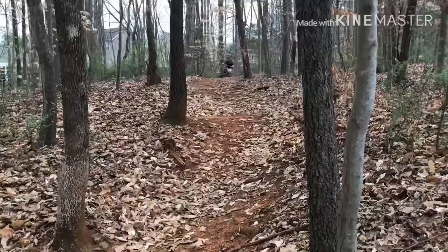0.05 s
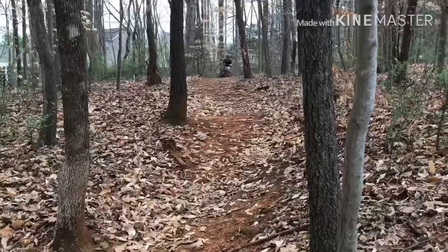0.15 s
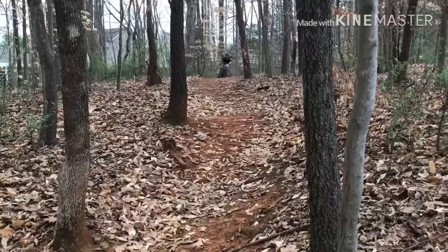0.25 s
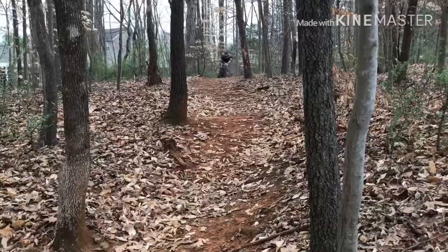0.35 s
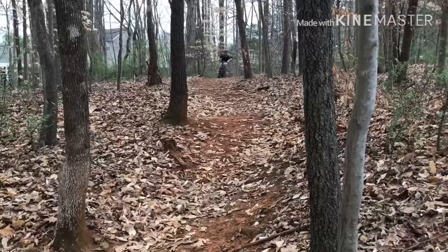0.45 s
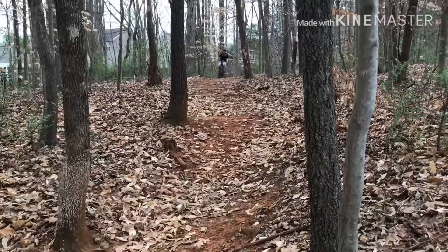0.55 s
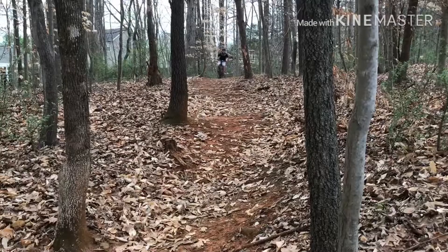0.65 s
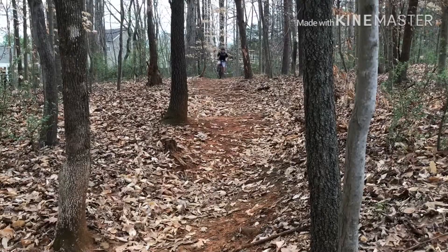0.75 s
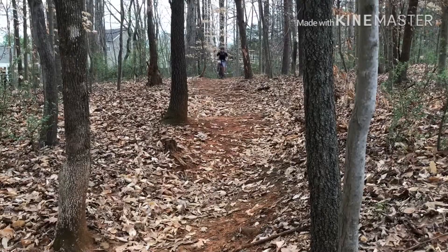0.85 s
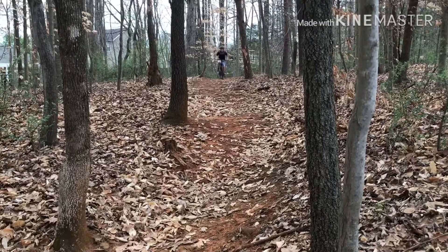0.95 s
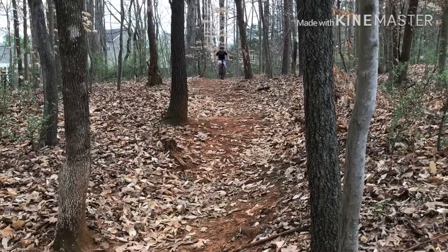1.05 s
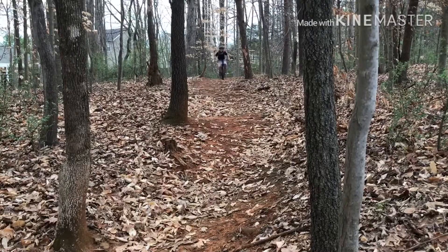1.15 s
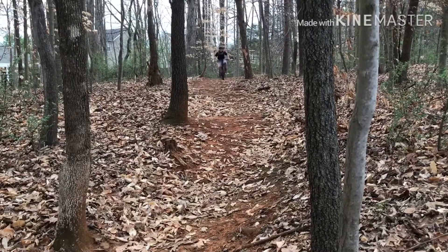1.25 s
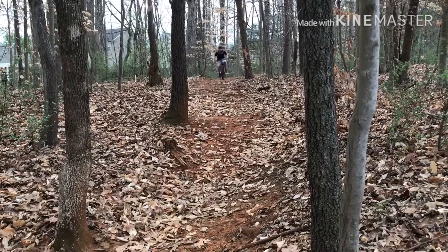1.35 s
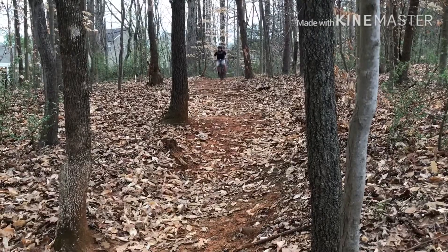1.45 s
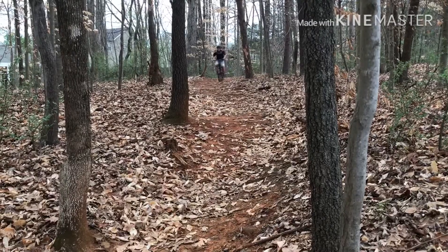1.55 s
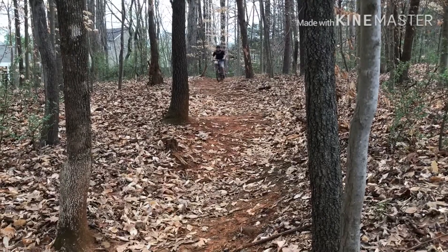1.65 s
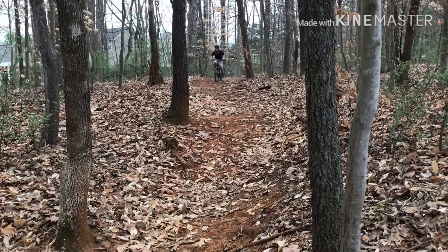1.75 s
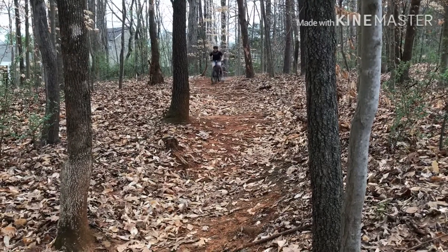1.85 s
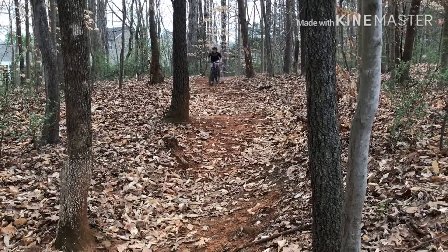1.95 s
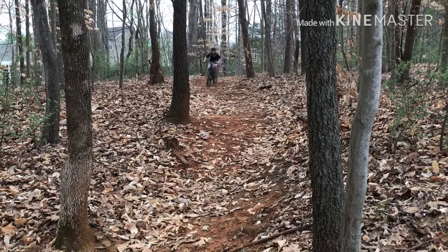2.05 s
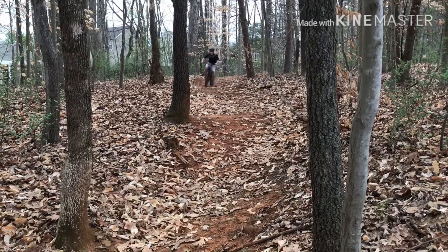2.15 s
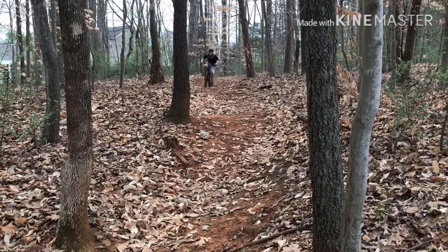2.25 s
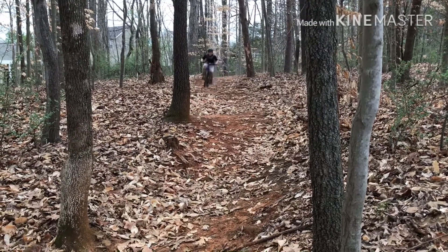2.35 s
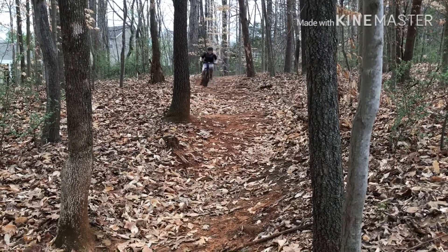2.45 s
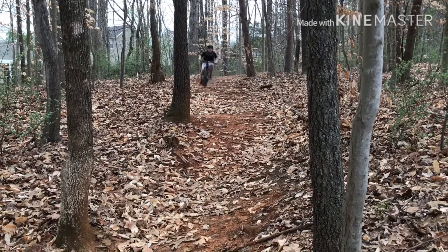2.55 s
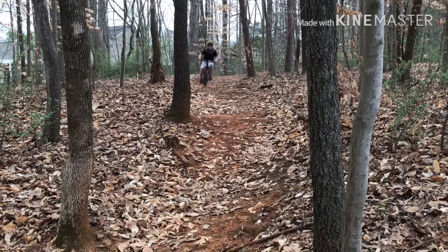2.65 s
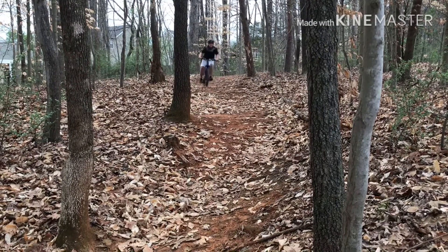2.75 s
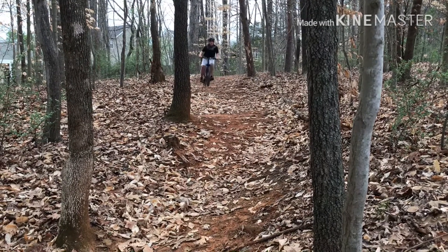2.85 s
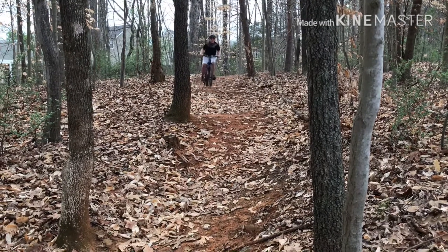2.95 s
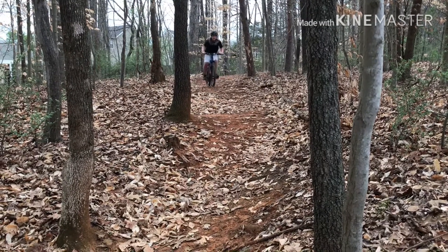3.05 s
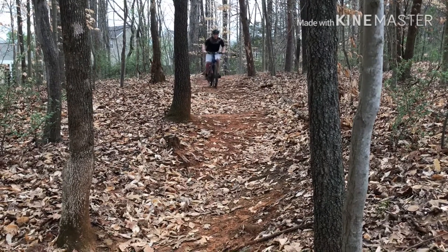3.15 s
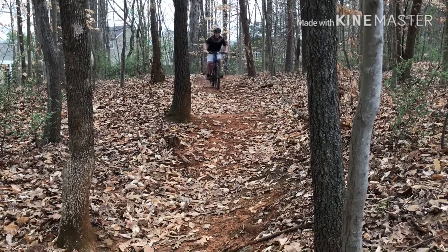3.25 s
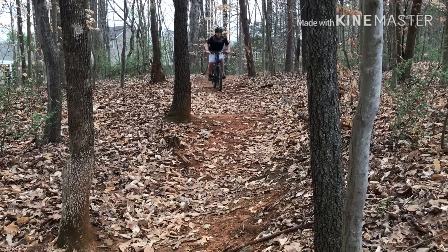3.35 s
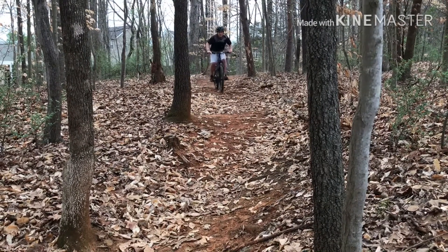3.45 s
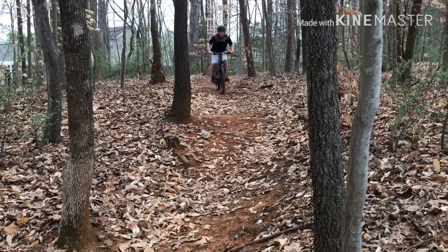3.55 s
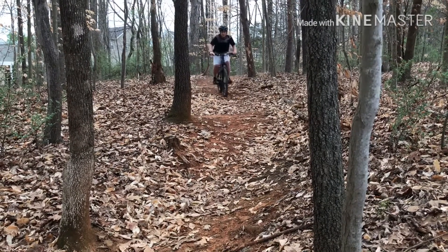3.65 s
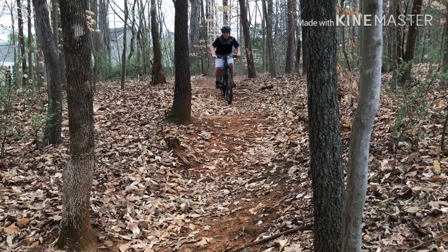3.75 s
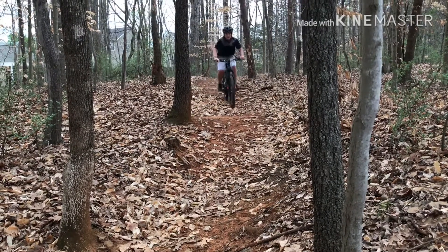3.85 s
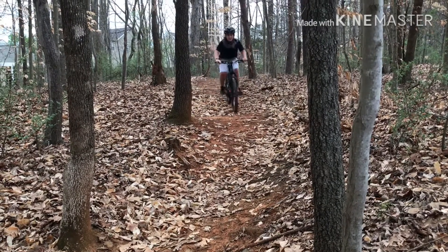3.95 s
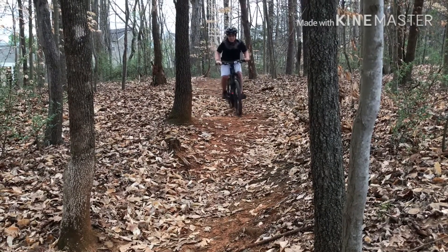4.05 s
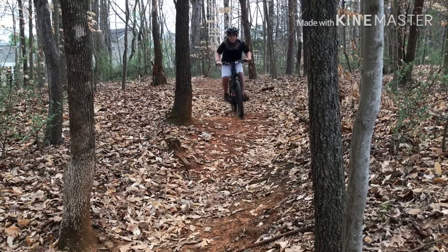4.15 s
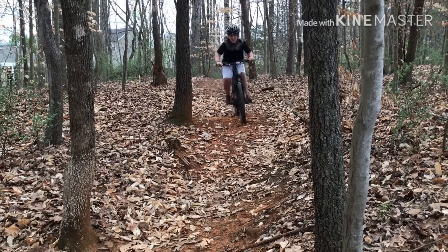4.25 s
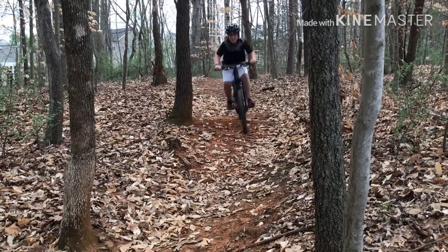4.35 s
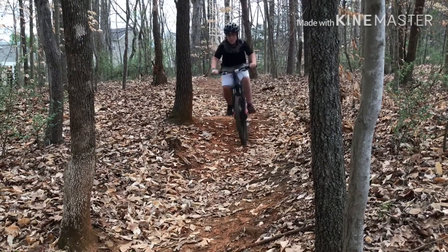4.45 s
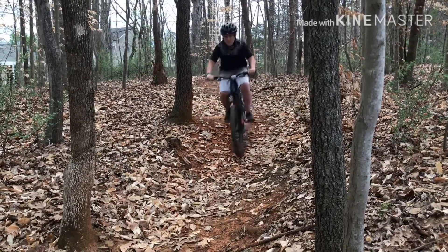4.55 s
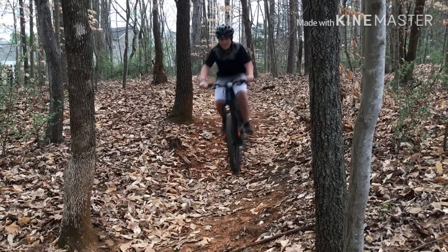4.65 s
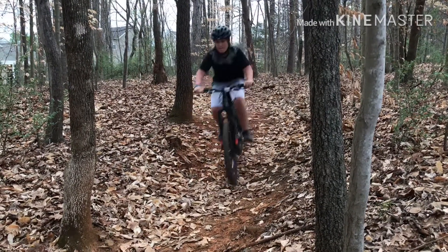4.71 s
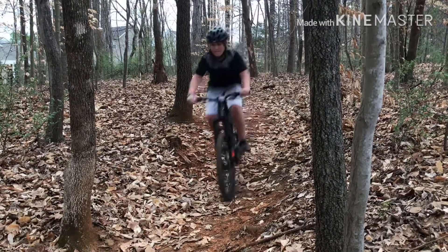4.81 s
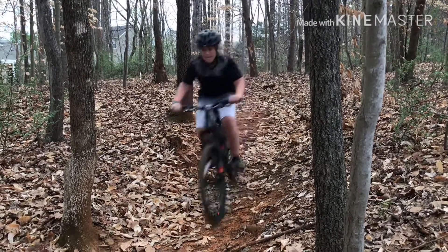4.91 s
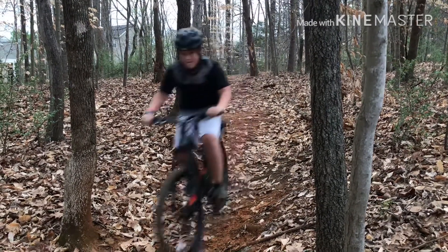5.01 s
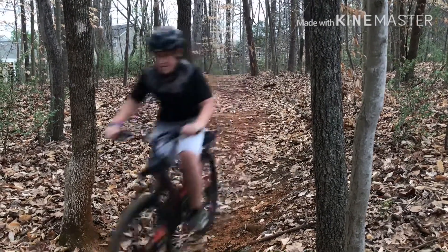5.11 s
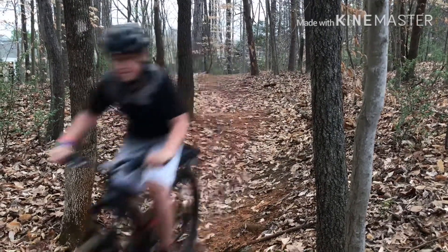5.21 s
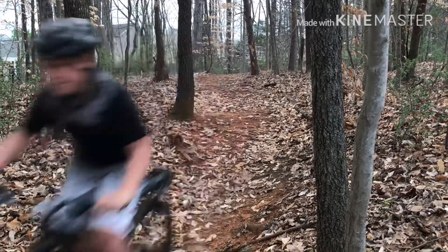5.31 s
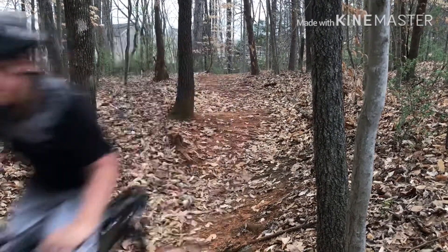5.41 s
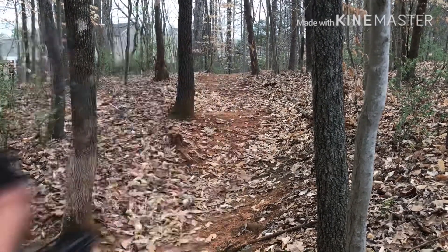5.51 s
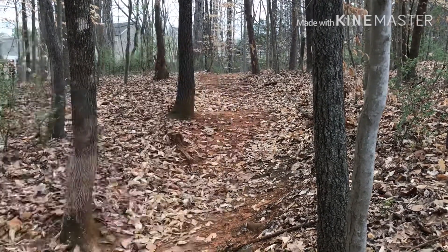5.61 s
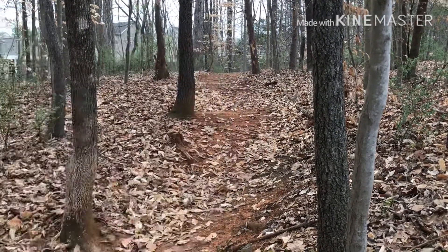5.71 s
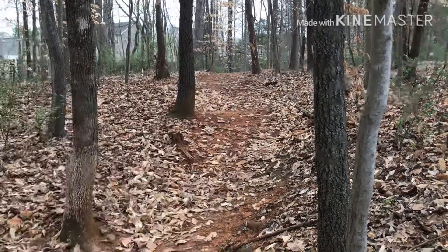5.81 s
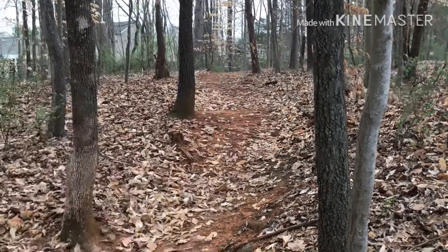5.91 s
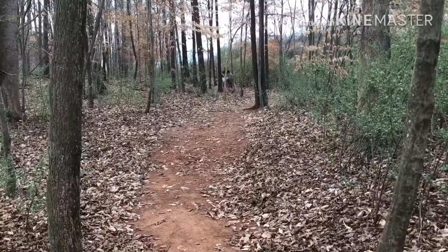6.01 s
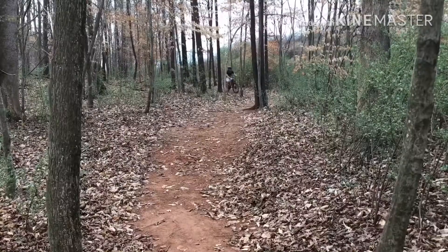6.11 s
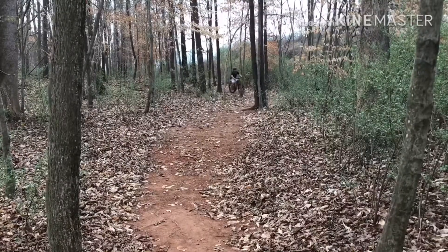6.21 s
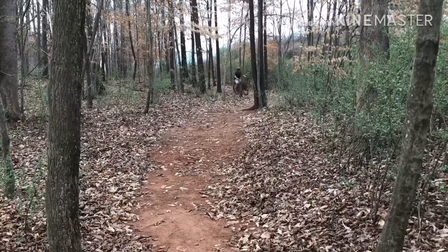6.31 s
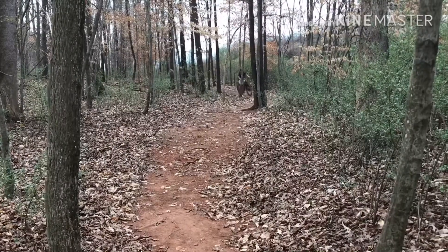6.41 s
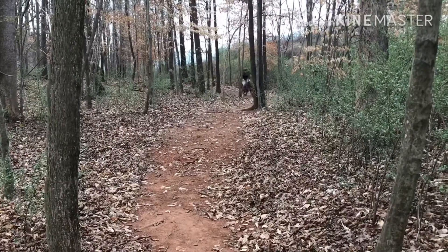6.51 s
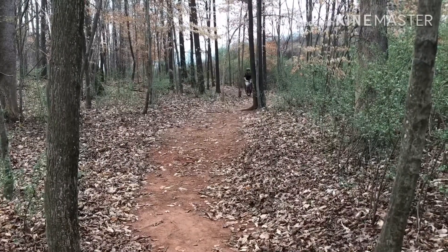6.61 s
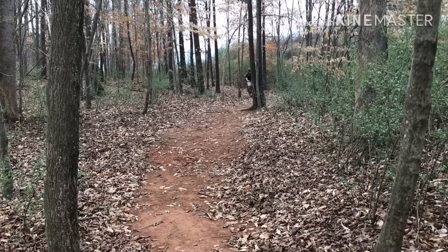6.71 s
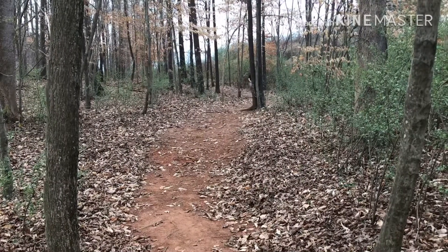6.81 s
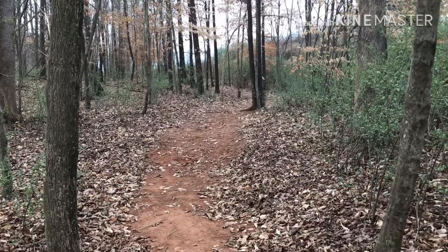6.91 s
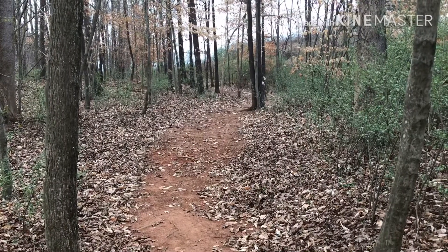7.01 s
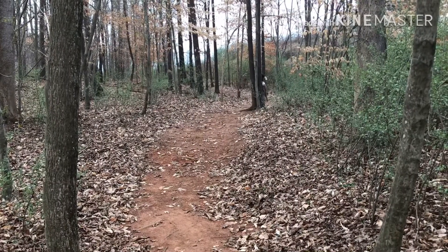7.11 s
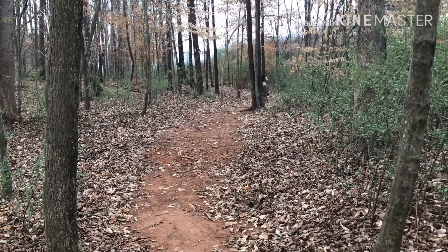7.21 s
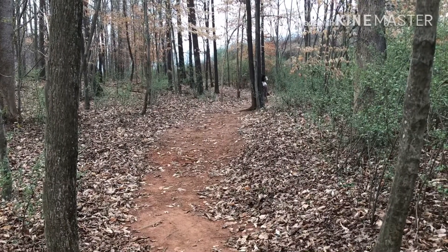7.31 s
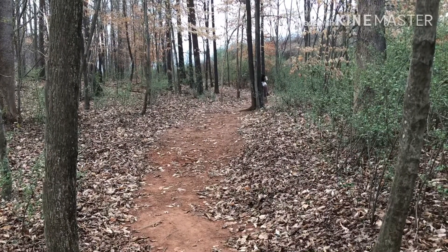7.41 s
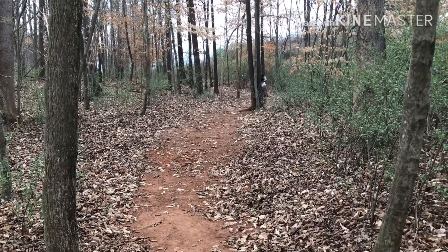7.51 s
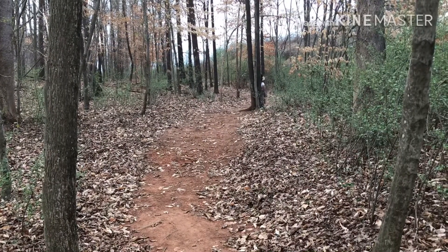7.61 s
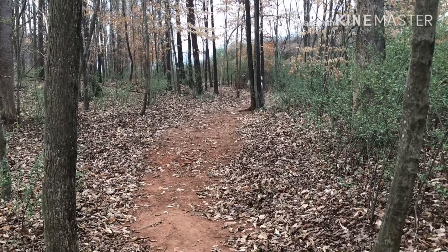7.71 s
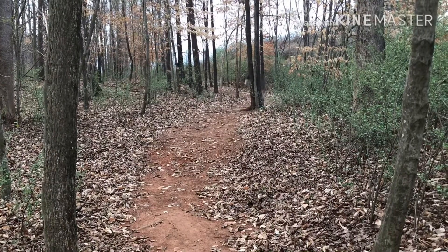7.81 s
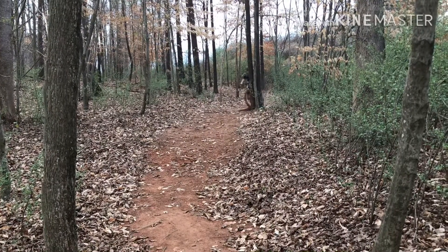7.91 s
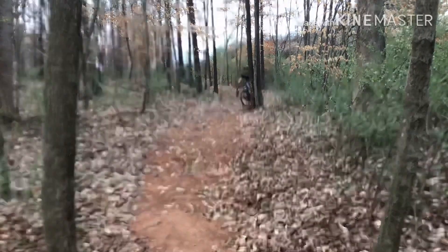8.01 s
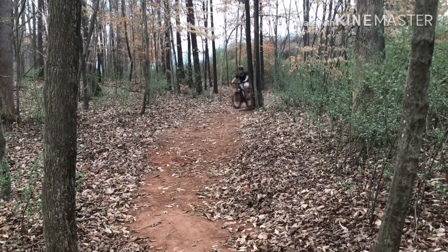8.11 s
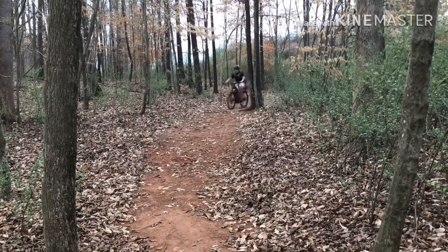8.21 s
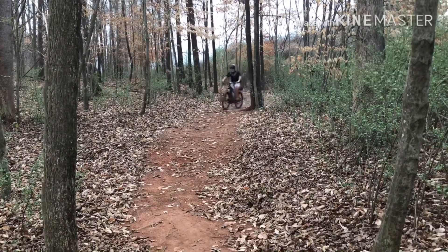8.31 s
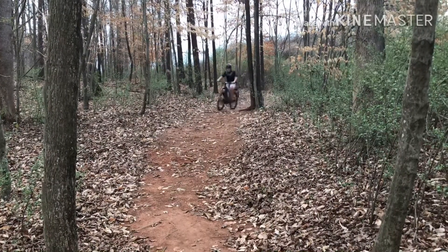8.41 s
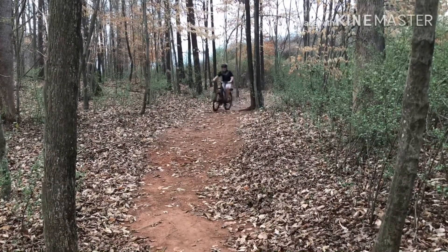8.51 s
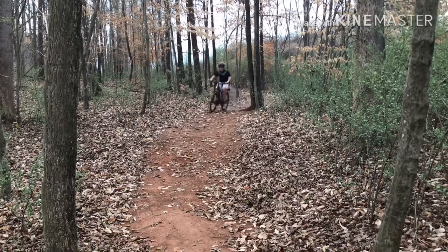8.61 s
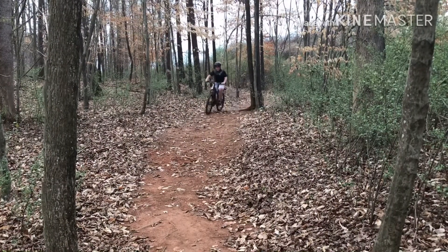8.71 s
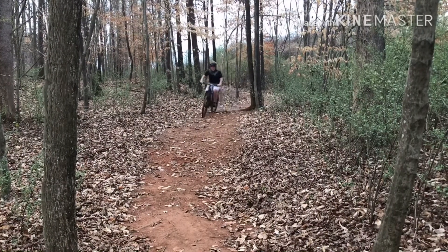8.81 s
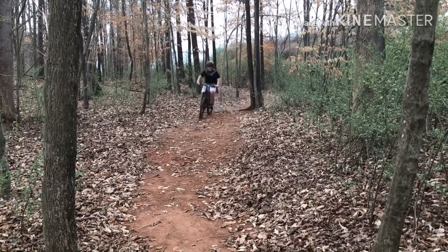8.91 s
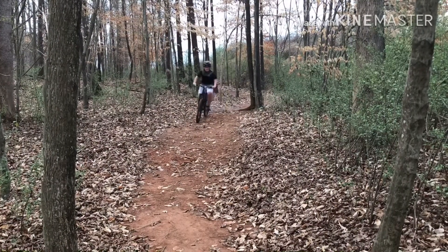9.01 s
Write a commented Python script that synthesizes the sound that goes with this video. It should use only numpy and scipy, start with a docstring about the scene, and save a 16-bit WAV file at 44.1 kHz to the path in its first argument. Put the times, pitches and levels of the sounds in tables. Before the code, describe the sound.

Outdoors in leafy woods, low rumble and faint hiss, a few bird whistles and a far engine rising then dropping. A bicycle nears with loose chain rattles, ticking freewheel and dry leaf crunch, passing very close around five and a half seconds with a snap and wind buffet. After a short fade, a second approach starts far off, quieter, with a microphone knock and growing crackle.

```python
"""Mountain bike on a leafy trail

A bike rolls through the woods and passes close by, then after a short fade approaches again from far off.
Tyres sound by brittle fracture of leaves and twigs, the slapping chain by modal resonance, the freewheel
by periodic impacts; tree trunks scatter the sound. A distant engine (harmonic synthesis) revs up and
drops back, small birds whistle (frequency modulation), and the microphone gets one knock (modal decay).
"""
import sys
import numpy as np
from scipy import signal
from scipy.fft import rfft, irfft
from scipy.io import wavfile

SR = 44100
rng = np.random.default_rng(int(sys.argv[2]) if len(sys.argv) > 2 else 0)


def wav_out(sig):
    """Save sig, one row per channel (or a flat mono array), as 16-bit PCM at SR to the path in sys.argv[1]."""
    wavfile.write(sys.argv[1], SR, np.round(np.clip(np.atleast_2d(sig).T, -1, 1) * 32767).astype(np.int16))


N = 399546
TIME = np.arange(N) / SR
SECOND_RIDE_S = 5.94   # the second ride's settings hold from here
CUTOFF_HZ, FADE_OUT_S = 15750, 0.16

# the two stretches of sound: (start [s], end [s], fade-in [s])
STRETCHES = [(-.005, 5.925, 0.2), (5.968, 9.3, 0.19)]
# straight rides past the microphone: (nearest at [s], speed [m/s], nearest distance [m])
PASSES = [(5.42, 3.84, 1.3), (11.2, 4.95, 1.5)]

# background spectrum of the woods at each of two spots: (frequency [Hz], relative level [dB])
AIR_FIRST = [(15, -63), (25, -10.5), (55, -1.5), (76, 1.5), (157, -10), (212, -15), (256, -20.5),
             (427, -23.5), (591, -27), (962, -27), (1520, -35), (2550, -35), (3920, -41.5), (5880, -45.5),
             (16000, -52.5)]
AIR_SECOND = [(15, -17), (25, -19.5), (64, -1), (212, -17), (270, -21.5), (301, -20), (451, -27),
              (516, -24.5), (1070, -30), (1230, -32), (1400, -38), (1700, -33.5), (4140, -39.5),
              (8360, -42), (16000, -50)]
AIR_FIRST_DB, AIR_SECOND_DB = -44, -48
# gusts of the rider's wake on the microphone: (middle [s], length [s], level [dB])
GUSTS = [(5.69, 0.27, -32.5), (5.809, 0.047, -26)]

# spectrum of cracking leaves and grit: (frequency [Hz], relative level [dB])
LEAVES = [(120, -13.5), (200, 4.5), (300, -1.5), (480, -5.5), (800, -6), (1300, -4.5), (1800, -6.5),
          (2450, -0.5), (3100, -5.5), (4400, -9), (5400, -5.5), (8400, -5.5), (12500, -5), (16000, -6.5)]
# how thickly leaves and grit cover the trail: (time [s], level [dB])
COVER = [(1.7, -22), (2.6, -15), (3.0, -3), (3.62, -5.5), (3.9, 2), (4.35, 0.5), (4.6, -3.5), (4.8, 3.5),
         (4.93, -0.5), (5.25, -0.5), (5.6, 1), (5.95, -4), (6.0, -3), (7.9, -22.5), (8.3, -9.5),
         (9.06, -1.5)]
# drifts of leaves that the wheels plough through: (middle [s], length [s], extra level [dB])
LEAF_DRIFTS = [(3.928, .1, 4.5), (4.051, 0.1, 10.5), (4.433, 0.076, 5), (4.765, .1, 4.5), (4.99, .08, 7),
               (5.26, 0.23, 6.5), (5.519, .08, 5.5), (8.713, .12, 6)]
DIRT_DB, CRUNCH_DB, CRACKLE_DB = -37.5, -35, -36.5   # at 1 m on 0 dB of cover

# distant engine: (time [s], strongest line [Hz], its level [dB], reference level of other orders [dB])
ENGINE = [(.1, 151, -44, -76), (.3, 156.6, -44, -75), (.95, 188.7, -44.5, -71), (1.2, 198, -55.5, -68),
          (1.75, 227, -48, -63), (2.1, 246.2, -50.5, -63), (2.62, 273, -58, -57.5),
          (2.87, 280.2, -46.5, -61), (3.0, 255.6, -46.5, -48.5), (3.17, 202.4, -45.5, -50),
          (3.35, 170, -38.5, -52.5), (3.72, 166.5, -32, -60.5), (3.86, 166, -51.5, -58),
          (4.32, 163, -48, -65)]
# swells of the exhaust's boom: (middle [s], length [s], level [dB])
BOOMS = [(.38, .7, -41.5), (3.3, 0.55, -41), (4.213, 0.48, -40.5)]
# bird notes: (time [s], length [s], start [Hz], middle [Hz], end [Hz], level [dB])
BIRDS = [(0.256, 0.063, 4020, 4080, 2900, -61.5), (0.323, 0.042, 4250, 4070, 3280, -73),
         (0.388, .09, 2800, 2570, 2750, -70), (0.47, 0.055, 2870, 3100, 3140, -65.5),
         (0.56, .13, 8200, 7900, 8400, -62), (0.578, 0.13, 7700, 7150, 7350, -70),
         (0.931, 0.041, 3770, 3670, 3660, -69), (1.0, 0.115, 3600, 3120, 3180, -68),
         (2.527, 0.085, 2610, 2985, 2980, -58), (2.65, 0.08, 2670, 2460, 2396, -62),
         (7.129, .06, 5800, 6520, 6100, -51.5), (7.36, 0.03, 6700, 6400, 5950, -56),
         (7.394, 0.057, 6000, 6470, 5700, -52.5)]

# chain slaps: (time [s], level [dB], top jingle relative to it [dB], clack pitch [Hz])
SLAPS = [(1.9127, -44, -1.5, 2550), (2.0078, -52.5, -8, 3380), (2.057, -55.5, -2, 2920),
         (2.1353, -49.5, 4, 2415), (2.2567, -49.5, -4, 2420), (2.3266, -55, -4, 2970),
         (2.4728, -55.5, 5, 2470), (3.2474, -51, -8, 2420), (3.6772, -48.5, 7, 2270),
         (3.7822, -42, -1, 2070), (4.0432, -36.5, -14, 2072), (4.3867, -46, 3, 2670),
         (4.54, -45, -12, 2440), (4.6288, -44.5, -6, 2450), (4.645, -37, -1, 2040),
         (4.7743, -43, -13, 2300), (4.8376, -45.5, 6, 2340), (5.0046, -30, -3, 2490),
         (5.052, -33.5, 3, 2640), (5.1079, -32.5, 0, 2100), (5.1959, -36.5, 2.5, 2600),
         (5.3576, -27, -2, 2940), (5.4314, -39, 7, 2450), (5.4448, -37.5, -1, 2980), (5.5189, -34, 0, 2350),
         (5.6254, -27, -4.5, 2960), (6.2015, -47.5, 4, 3560), (6.3181, -45, 2, 3500),
         (6.825, -53.5, 0, 2070), (6.9969, -54, -6, 2500), (8.0688, -50, 4.5, 2200), (8.3303, -51, 8, 2090),
         (8.4339, -53, -0.5, 2480), (8.708, -56, 7, 3220), (8.747, -61, 14, 2150), (8.855, -43, 3.5, 2460),
         (8.9556, -39, -5, 3600)]
# modes of frame, chain and sprockets: (frequency [Hz], width before damping [Hz], level [dB])
BIKE = [(1255, 14, -6.5), (1700, 68, -10.5), (2150, 65, 8.5), (2490, 110, 5), (2940, 150, 4.5),
        (3390, 84, 1.5), (3890, 100, -1.5), (4270, 58, -10), (5110, 58, -4), (5430, 140, 7.5),
        (5480, 92, 4), (5840, 150, -0.5), (7400, 79, -14), (8400, 410, -2.5), (9700, 320, -12.5),
        (10210, 240, 2.5), (10670, 1000, 0), (12500, 240, -11)]
# spectrum of the bare link contacts: (frequency [Hz], relative level [dB])
RATTLE = [(700, 3), (2300, -0.5), (4700, -7.5), (5800, 1.5), (7800, -7), (10000, 4), (10500, -20),
          (11100, -2), (13000, 2.5), (16000, -12)]
# decay time of a slap's rattle: (first ride [s], second ride [s])
RATTLE_S = [.012, 0.01]
# ring of the sprockets relative to a slap: (first ride [dB], second ride [dB])
SPROCKET_DB = [3.5, -11.5]

# coasting without pedalling: (from [s], until [s], pawl clicks [1/s], level at 1 m [dB])
COASTS = [(2.916, 5.903, 48, -45.5), (6.106, 9.068, 68, -43)]
# spectrum of the pawl ticks: (frequency [Hz], relative level [dB])
PAWL = [(1500, -18), (2800, -2), (3400, -7), (4200, 0), (5000, -8), (7000, -1), (7900, -4), (8600, 0),
        (9700, 1), (10800, -6), (12500, -6), (14000, -7), (15100, -3), (16000, -7)]
# twigs and grit snapping under the tyres: (time [s], peak level [dB], dull above [Hz])
SNAPS = [(4.2763, -21.5, 7000), (4.388, -38, 9240), (5.258, -13, 3530), (5.671, -18, 8000),
         (7.892, -41.5, 3000), (8.2405, -34.5, 2480), (8.36, -40, 2970), (8.3803, -30, 1260),
         (8.63, -31, 1460), (8.749, -33, 2480), (8.974, -27, 7000), (9.0156, -16.5, 20500)]
# a tyre bumps over a root: (time [s], frequency [Hz], peak level [dB])
ROOTS = [(4.712, 362, -31), (5.34, 296, -28)]
# modes of the knock on the microphone: (frequency [Hz], level [dB], t60 [s])
KNOCK = [(110, -37, 0.013), (600, -15.5, 0.015), (925, -26, 0.0057), (1520, -21.5, 0.003),
         (2750, -16, 0.0023), (4520, -26, 0.0019), (7000, -22, 0.0012)]
KNOCK_S = 7.9759


def from_db(db):
    """Logarithmic level: 20 dB is a factor of ten in amplitude."""
    return 10 ** (np.asarray(db) / 20)


def rms_one(x):
    """Normalization: scale to unit root mean square."""
    return x / np.sqrt(np.mean(x ** 2) + 1e-20)


def by_ride(first, second):
    """Piecewise selection: one value for each ride."""
    return np.where(TIME < SECOND_RIDE_S, first, second)


def in_time(rows):
    """Linear interpolation: each column of a curve at every sample."""
    s, *columns = np.transpose(rows)
    return [np.interp(TIME, s, column) for column in columns]


def during(rows, edge_s):
    """Trapezoidal gate: 1 while a curve lasts, sloping to 0 outside."""
    start, end = rows[0][0], rows[-1][0]
    return np.interp(TIME, [start - edge_s, start, end, end + edge_s], [0, 1, 1, 0])


def swell(middle_s, length_s):
    """Raised-cosine envelope: a smooth rise to 1 and back."""
    phase = np.clip((TIME - middle_s) / length_s, -.5, .5)
    return np.cos(np.pi * phase) ** 2


def add(out, s, sound):
    """Superposition: mix a sound in at time s."""
    at = int(s * SR)
    out[at:at + len(sound)] += sound[:max(N - at, 0)]


def drift(rate_hz):
    """Low-pass noise: slow random wandering with rms 1."""
    step = 40   # samples between computed points
    r = np.exp(-2 * np.pi * rate_hz * step / SR)
    noise = rng.standard_normal(N // step + 2002)
    slow = signal.lfilter([1], [1, -2 * r, r * r], noise)[2000:]   # past the settling
    return np.interp(np.arange(N) / step, np.arange(len(slow)), rms_one(slow))


def band(x, low_hz, high_hz, order=2):
    """Causal band-pass filtering."""
    edges = [low_hz, min(high_hz, .47 * SR)]
    sos = signal.butter(order, edges, "band", fs=SR, output="sos")
    return signal.sosfilt(sos, x + 1e-18)


def coloured(x, spectrum, size=8192):
    """Minimum-phase filtering: a folded cepstrum gives a causal filter with the given spectrum."""
    hz, db = np.transpose(spectrum)
    grid = np.maximum(np.arange(size // 2 + 1) * SR / size, 1)
    gain = from_db(np.interp(np.log(grid), np.log(hz), db))
    cepstrum = irfft(np.log(gain))[:size // 2]
    cepstrum[1:] *= 2
    impulse_response = irfft(np.exp(rfft(cepstrum, size)))
    return signal.fftconvolve(x, impulse_response)[:len(x)]


def ring(clicks, hz, t60):
    """Damped free oscillation: a unit click starts a decaying sine of height 1."""
    r, w = from_db(-60 / (t60 * SR)), 2 * np.pi * hz / SR
    return signal.lfilter([0, np.sin(w)], [1, -2 * r * np.cos(w), r * r], clicks + 1e-18)


def resonance(x, hz, width_hz):
    """Driven resonance: a two-pole resonator with about unit gain at its peak."""
    r = np.exp(-np.pi * width_hz / SR)
    zeros = np.array([1, 0, -1]) * (1 - r * r) / 2
    poles = [1, -2 * r * np.cos(2 * np.pi * hz / SR), r * r]
    return signal.lfilter(zeros, poles, x + 1e-18)


def grains(per_s, spread_db, size):
    """Random impulse process: many small clicks and a few large."""
    height = from_db(spread_db * np.minimum(rng.exponential(1, size), 4))
    return (rng.random(size) < per_s / SR) * height * rng.choice([-1, 1], size)


def distance():
    """Straight-line kinematics: metres from a bike passing at a steady speed."""
    first, second = [np.hypot(nearest_m, speed * (TIME - s)) for s, speed, nearest_m in PASSES]
    return by_ride(first, second)


def air(swell_db=0.4):
    """Filtered noise: far traffic rumble and faint hiss, plus the rider's wake buffeting the microphone."""
    first = from_db(AIR_FIRST_DB) * rms_one(coloured(rng.standard_normal(N), AIR_FIRST))
    second = from_db(AIR_SECOND_DB) * rms_one(coloured(rng.standard_normal(N), AIR_SECOND))
    gusts = sum(from_db(db) * swell(s, length) for s, length, db in GUSTS)
    wake = gusts * rms_one(band(rng.standard_normal(N), 34, 88))
    return by_ride(first, second) * from_db(swell_db * drift(8.8)) + wake


def leaf_cracks(per_s=400, spread_db=4.0, flicker_db=1.5, width_share=0.25, count=20):
    """Brittle fracture: flakes of every size ring for a few cycles, in an ever-changing mix of sizes."""
    cracks = np.zeros(N)
    for hz in np.geomspace(250, 15500, count):
        clicks = grains(per_s, spread_db, N) * from_db(flicker_db * drift(23))
        cracks += resonance(clicks, hz, width_share * hz)
    return cracks


def tyres(grit_per_s=7000, grit_spread_db=2.5, grit_db=-2.0, clump_db=2.5, patchy_db=1.0,
          dirt_follows=0.21, falloff=1.098):
    """Granular crushing over duller knobs on dirt; soft ground makes it fall faster than 1/distance."""
    grit = from_db(grit_db) * rms_one(grains(grit_per_s, grit_spread_db, N))
    cracks = rms_one(leaf_cracks()) + grit
    cracks = coloured(cracks * from_db(clump_db * drift(25)), LEAVES)
    leaves_db = in_time(COVER)[0] + patchy_db * drift(12)
    leaves_db += sum(db * swell(s, length) for s, length, db in LEAF_DRIFTS)
    dirt = from_db(DIRT_DB + dirt_follows * leaves_db) * rms_one(band(cracks, 150, 1650, order=3))
    crunch = from_db(CRUNCH_DB + leaves_db) * rms_one(band(cracks, 1650, 7500, order=3))
    crackle = from_db(CRACKLE_DB + leaves_db) * rms_one(band(cracks, 7500, 17500, order=3))
    return (dirt + crunch + crackle) / distance() ** falloff


def engine(wander=0.0078, flutter_db=3.0, second_db=-0.5, sixth_db=-15.0, boom_hz=60, boom_width_hz=9):
    """Harmonic synthesis: low orders flutter on their way through the trees, over the exhaust's boom."""
    hz, main_db, other_db = in_time(ENGINE)
    cycle_hz = hz / 3 * (1 + wander * drift(12))   # the strongest line is the third order
    cycle = 2 * np.pi * np.cumsum(cycle_hz) / SR
    orders = [(2, other_db + second_db), (3, main_db), (4, other_db), (6, other_db + sixth_db)]
    drone = sum(from_db(db + flutter_db * drift(3.35)) * np.sin(k * cycle) for k, db in orders)
    boom = resonance(rng.standard_normal(N), boom_hz, boom_width_hz)
    boom = rms_one(resonance(boom, boom_hz, boom_width_hz))
    boom_swells = sum(from_db(db) * swell(s, length) for s, length, db in BOOMS)
    return during(ENGINE, 0.074) * drone + boom_swells * boom


def birds():
    """Frequency modulation: thin whistles bend through three pitches."""
    out, wobble = np.zeros(N), 1 + .012 * drift(90)
    for s, length, start_hz, middle_hz, end_hz, db in BIRDS:
        u = np.linspace(0, 1, int(length * SR))
        bend = np.polyfit([0, .5, 1], [start_hz, middle_hz, end_hz], 2)
        hz = np.polyval(bend, u) * wobble[int(s * SR):][:len(u)]
        whistle = np.sin(2 * np.pi * np.cumsum(hz) / SR)
        add(out, s, from_db(db) * np.sin(np.pi * u) * whistle)
    return out


def woods(x, low_t60=0.71, high_t60=0.38, high_db=0.5, build_s=0.00047, size=40000):
    """Multiple scattering: many faint echoes off the trunks, of which the treble dies first."""
    t = np.arange(size) / SR
    echoes = grains(5000, 4.2, size) * (1 - np.exp(-t / build_s))
    low = band(echoes, 150, 7000) * from_db(-60 * t / low_t60)
    high = band(echoes, 7000, 17000) * from_db(high_db - 60 * t / high_t60)
    tail = low + high
    return signal.fftconvolve(x, tail / np.sqrt(np.sum(tail ** 2)))[:N]


def chain(links_per_s=8000, link_spread_db=3.5, first_hit=1.0, dry_db=-0.5, clack_db=5.5,
          clack_width_hz=600, vary_db=2.0, damping_hz=90, detune=0.027, size=9000):
    """Modal excitation: dying bursts of link contacts ring modes damped and detuned by the swinging chain."""
    out, t = np.zeros(N), np.arange(size) / SR
    for s, db, jingle_db, clack_hz in SLAPS:
        ride = int(s > SECOND_RIDE_S)
        contacts = grains(links_per_s, link_spread_db, size) * np.exp(-t / RATTLE_S[ride])
        contacts[0] += first_hit
        clack = resonance(contacts, clack_hz, clack_width_hz)   # depends on where the chain lands
        slap = from_db(clack_db) * clack + from_db(dry_db) * coloured(contacts, RATTLE)
        for hz, width_hz, mode_db in BIKE:
            pitch_hz = hz * (1 + detune * rng.standard_normal())
            strength = from_db(mode_db + rng.normal(0, vary_db))
            slap += strength * resonance(contacts, pitch_hz, width_hz + damping_hz)
        parts = [(850, 4500, 0), (4500, 7500, SPROCKET_DB[ride]), (7500, 16500, jingle_db)]
        for low_hz, high_hz, part_db in parts:
            part = band(slap, low_hz, high_hz, order=3)
            onset_level = np.std(part[t < .015])
            add(out, s, from_db(db + part_db) * part / onset_level)
    return out


def through_air(x, metres, reach_m=10.0, dull_hz=11500):
    """Atmospheric absorption: distance takes off the top of the treble."""
    dull = signal.sosfiltfilt(signal.butter(2, dull_hz, fs=SR, output="sos"), x)
    return dull + (x - dull) * np.exp(-metres / reach_m)


def freewheel(tick_s=0.0069, uneven_db=7.0, speed_wander=0.091, ease_s=0.12):
    """Periodic impacts: pawls drop over ratchet teeth at a wandering rate while the rider coasts."""
    per_s = by_ride(COASTS[0][2], COASTS[1][2]) * (1 + speed_wander * drift(1.5))
    drops = np.diff(np.floor(np.cumsum(per_s) / SR), prepend=0)   # 1 at each tooth
    drops = drops * from_db(uneven_db * drift(30))
    decay = np.exp(-1 / (tick_s * SR))
    ticks = signal.lfilter([1], [1, -decay], drops + 1e-18) * rng.standard_normal(N)
    first, second = [from_db(db) * during([[start], [end]], ease_s) for start, end, _, db in COASTS]
    return by_ride(first, second) / distance() * rms_one(coloured(ticks, PAWL))


def twigs(crack_s=0.001, splinter_s=0.016, splinter_db=-15.5, size=2000):
    """Fracture transient: a sharp crack with weaker, longer splintering."""
    out, t = np.zeros(N), np.arange(size) / SR
    for s, db, dull_hz in SNAPS:
        envelope = np.exp(-t / crack_s) + from_db(splinter_db) * np.exp(-t / splinter_s)
        fracture = rng.standard_normal(size) * envelope
        snap = band(fracture, dull_hz / 5, dull_hz, order=1)
        add(out, s, from_db(db) * snap / np.abs(snap).max())
    return out


def click_at(s):
    """Unit impulse: one sample of height 1 at time s."""
    return 1.0 * (np.arange(N) == int(s * SR))


def roots(t60=0.029):
    """Impulse response: each root gives the tyre one short hollow bump."""
    return sum(from_db(db) * ring(click_at(s), hz, t60) for s, hz, db in ROOTS)


def knock():
    """Modal decay: a tap on the microphone rings several short modes, of alternating sign."""
    tap = click_at(KNOCK_S)
    return sum((-1) ** k * from_db(db) * ring(tap, hz, t60) for k, (hz, db, t60) in enumerate(KNOCK))


def fades():
    """Linear envelope: each stretch fades in and out along straight ramps."""
    gain = np.zeros(N)
    for start, end, rise_s in STRETCHES:
        gain += np.clip(np.minimum((TIME - start) / rise_s, (end - TIME) / FADE_OUT_S), 0, 1)
    return gain


def scene(echo_db_at_10_m=-7.0, echo_growth=0.47, bird_echo_db=0.0):
    """Direct and scattered sound: with distance the chain dulls and the bike's share of echo grows."""
    metres = distance()
    bike = tyres() + through_air(chain(), metres) + twigs() + roots() + freewheel()
    song = birds()
    bike_echo_gain = from_db(echo_db_at_10_m) * (metres / 10) ** echo_growth
    echoes = woods(bike_echo_gain * bike + from_db(bird_echo_db) * song)
    return (bike + song + echoes + engine() + air() + knock())[None]


def record(dry, notch_hz=10550, notch_width_hz=600, notch_depth=0.52):
    """Linear filtering: the microphone has a narrow treble dip; then come the fades and a steep top cut."""
    heard = dry - notch_depth * resonance(dry, notch_hz, notch_width_hz)
    top_cut = signal.ellip(14, .1, 80, CUTOFF_HZ, fs=SR, output="sos")
    return signal.sosfilt(top_cut, heard * fades())


dry = scene()
out = record(dry)
wav_out(out)
```